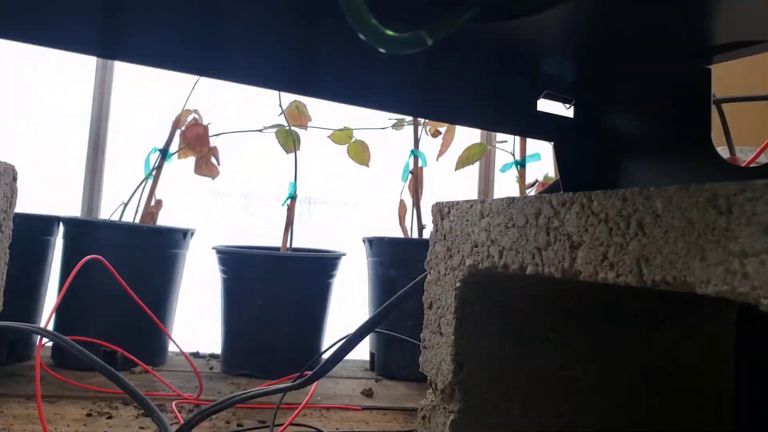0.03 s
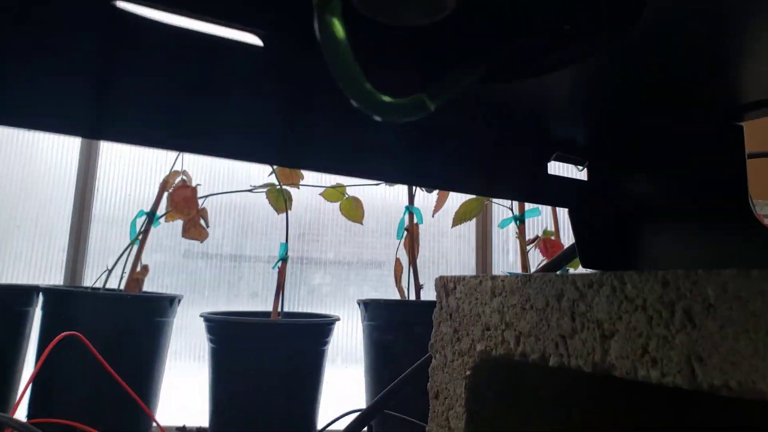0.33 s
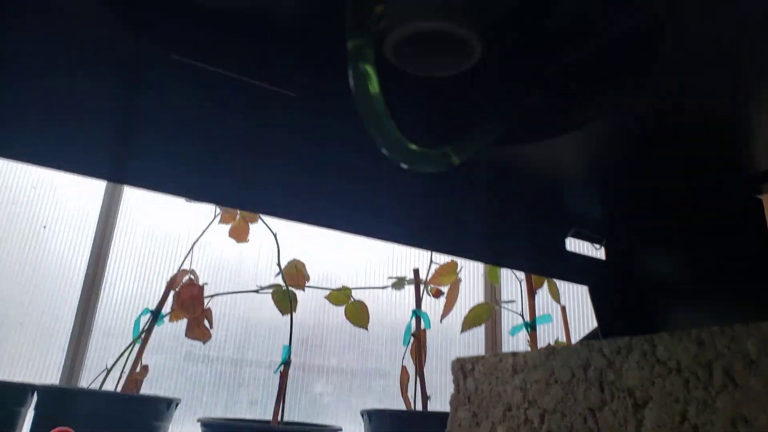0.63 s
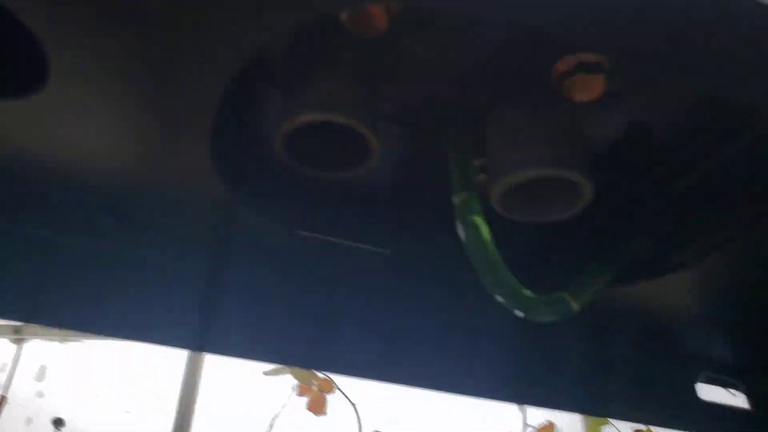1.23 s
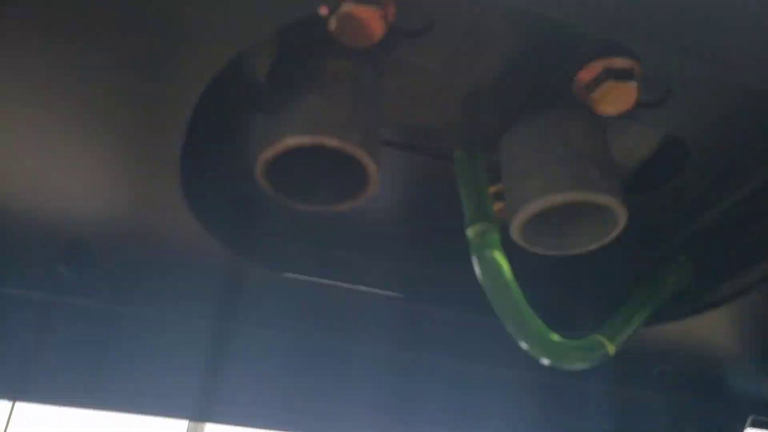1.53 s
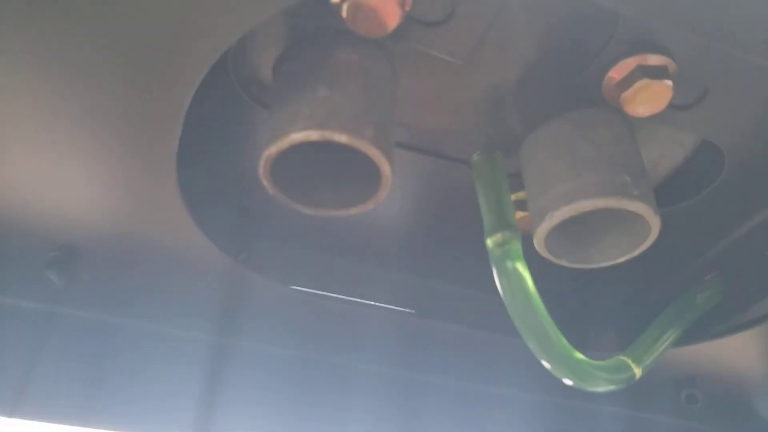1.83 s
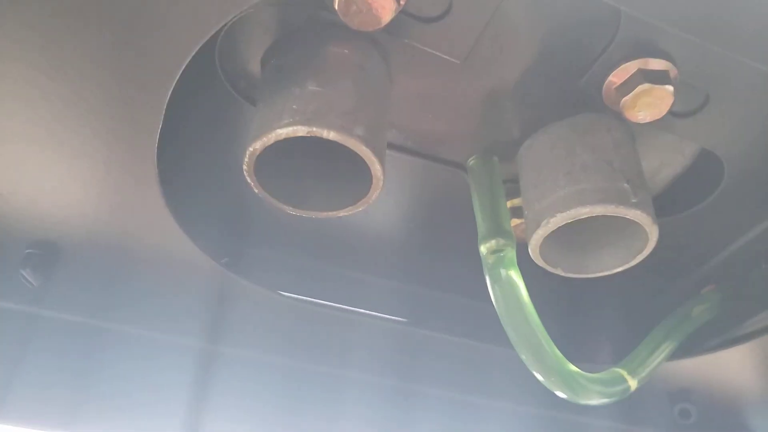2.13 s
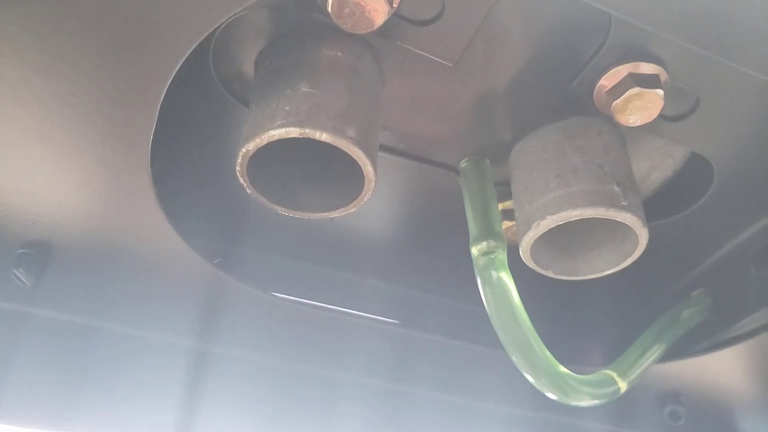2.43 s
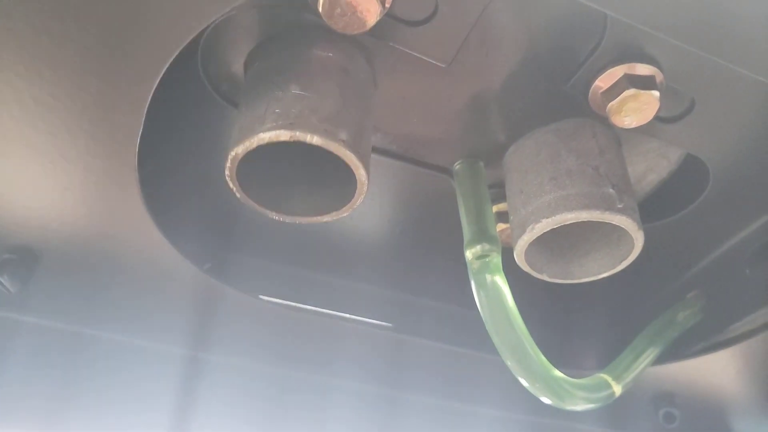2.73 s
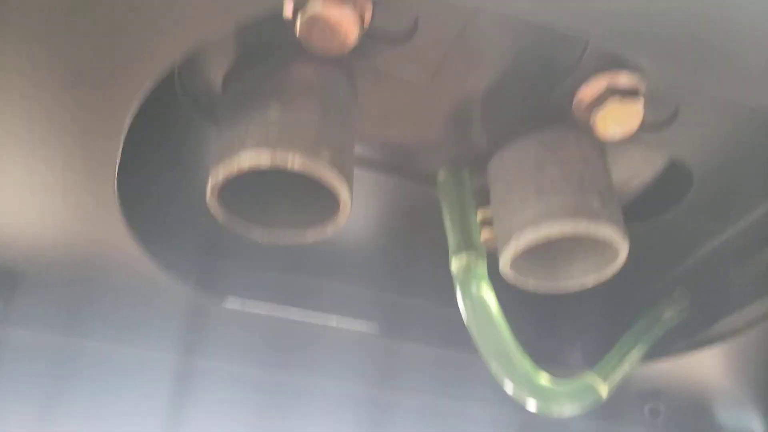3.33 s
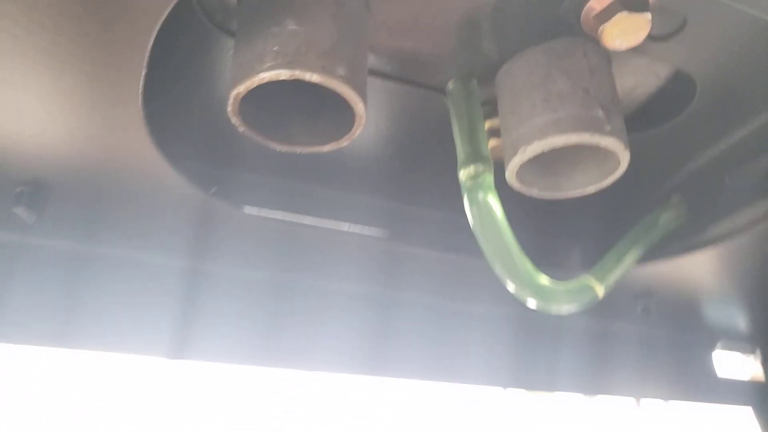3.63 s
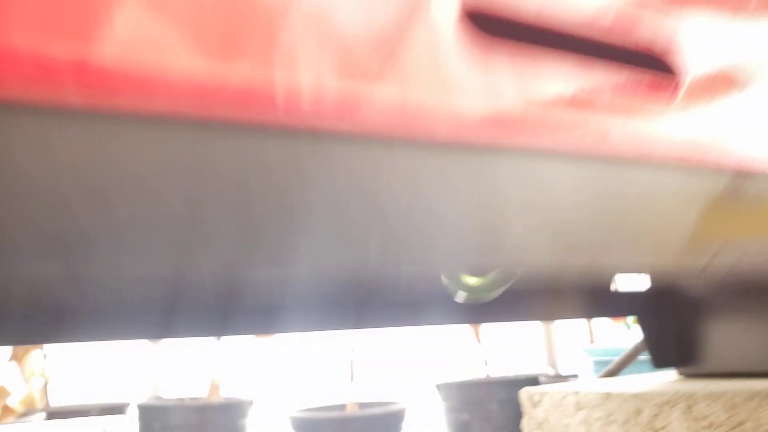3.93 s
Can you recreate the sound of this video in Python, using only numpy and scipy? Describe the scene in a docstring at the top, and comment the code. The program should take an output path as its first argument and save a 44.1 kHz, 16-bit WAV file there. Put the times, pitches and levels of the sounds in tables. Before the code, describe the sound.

A diesel air heater runs with a low roar, rushing air and blower whine.

```python
"""A diesel air heater runs indoors. From the start the burner roars low, the intake pipe sings a breathy
note, air rushes through resonant ducts and the blower whines, its hiss fluttering once a turn.
From 0.5 s the microphones move from beside the base plate in under the two open pipe stubs: the duct
resonances shift and a bright spray of air fades. The chamber's drone swells, most near 0.7 and 2.6 s.
After 3 s a thin whistle rises; from 3.5 s the microphones move partway back. Faint ticks fall between."""
import sys
import numpy as np
from scipy import signal
from scipy.fft import rfft, irfft, next_fast_len
from scipy.io import wavfile
from scipy.ndimage import uniform_filter1d, map_coordinates

SR = 44100
rng = np.random.default_rng(int(sys.argv[2]) if len(sys.argv) > 2 else 0)


def generate_wav(signal):
    """Clip the signal to [-1, 1] and save it as 16-bit WAV at the path in sys.argv[1]."""
    frames = np.transpose(np.atleast_2d(signal))
    scaled = np.clip(frames, -1, 1) * 32767
    pcm = np.round(scaled).astype(np.int16)
    wavfile.write(sys.argv[1], SR, pcm)


N = 176400
TIME_S = np.arange(N) / SR
FFT_SIZE = next_fast_len(N + 8192)
FREQ_HZ = np.fft.rfftfreq(FFT_SIZE, 1 / SR)
SIDE = np.array([[1], [-1]])  # left, right

# burner stereo balance: freq_hz, left_over_right_db
BURNER_BALANCE = [(40, 3.5), (200, 3.5), (280, 2), (400, 2)]


def burner():
    """The flame's low, flickering roar from the exhaust stub."""
    # roar spectrum: freq_hz, relative_db
    spectrum = [(15, -95.5), (30, -84), (40, -66.5), (52, -60), (73, -49.5), (92, -51), (125, -45),
                (185, -38.5), (214, -40), (248, -41.5), (274, -39), (305, -46.5), (350, -52.5), (420, -67),
                (600, -112)]
    # flame strength: time_s, level_db
    flame = [(0, -16.5), (.4, -19.5), (.55, -20), (.66, -17), (.9, -20), (1.15, -19.5), (1.42, -17.5),
             (1.62, -21), (1.8, -17.5), (2.35, -18.5), (2.6, -20.5), (2.8, -19), (3.3, -19.5), (4, -21.5)]
    trim_db, flicker_db = 0.65, 1
    roar = unit(rush(amp(over_freq(spectrum)) * pan(over_freq(BURNER_BALANCE)), likeness=1.0))
    return roar * amp(over_time(flame) + trim_db + flicker_db * wobble(rate_hz=12))


def drone():
    """The flame drives the chamber's resonance, unsteady in pitch and strength."""
    # drone swells: time_s, level_db
    swells = [(0, -31.5), (.6, -28.5), (.74, -16.5), (.82, -30), (1.3, -24.5), (1.45, -20), (1.62, -29.5),
              (1.71, -18), (1.78, -30), (2, -23), (2.2, -24), (2.44, -28.5), (2.51, -18), (2.62, -15.5),
              (2.76, -22), (2.85, -28.5), (3.1, -23), (3.5, -30.5), (4, -26)]
    pitch_hz, wander_hz, flicker_db = 213.1, 8.94, 2.5
    phase = 2 * np.pi * np.cumsum(pitch_hz + wander_hz * wobble(rate_hz=45)) / SR
    envelope = amp(over_time(swells) + flicker_db * wobble(rate_hz=35.15))
    tone = np.sqrt(2) * np.sin(phase) * envelope
    return filtered(tone, pan(over_freq(BURNER_BALANCE)) * left_lead())


def intake():
    """Turbulence rings the short intake pipe: one breathy note with a narrow core."""
    # skirt around the note: freq_hz, relative_db
    skirt = [(900, -105), (1150, -85), (1330, -59), (1400, -60), (1500, -54.5), (1570, -60.5),
             (1680, -64.5), (1900, -75.5), (2300, -105)]
    # note strength: time_s, level_db
    strength = [(0, -35.5), (.5, -37.5), (.85, -40), (1.05, -36), (1.7, -34.5), (2.3, -34), (2.9, -38),
                (4, -34.5)]
    pitch_hz, trim_db, flicker_db = 1429, 5, 0.2
    peak = amp(-50.5) * resonance(pitch_hz, width_hz=48)
    core = amp(-49) * resonance(pitch_hz, width_hz=13)
    spectrum = np.hypot(amp(over_freq(skirt)), np.hypot(peak, core))
    note = unit(rush(spectrum * pan(balance_db=-12.5), likeness=1))
    return note * amp(over_time(strength) + trim_db + flicker_db * wobble(rate_hz=10))


def airflow():
    """Air rushing through the ducts: broad noise, whistle, spray and resonances flicker together."""
    # broad rush: freq_hz, left_density_db, right_density_db
    spectrum = [(152, -77, -75), (392, -65, -60.5), (470, -60, -66), (610, -62, -65.5), (821, -63.5, -73),
                (990, -73.5, -73.5), (1170, -66.5, -69), (1770, -75, -70), (2104, -68, -75),
                (2560, -79, -94.5), (3150, -79.5, -82.5), (3700, -78.5, -89.5), (3990, -83, -97),
                (4500, -85.5, -87), (5300, -84, -85), (6130, -87.5, -109), (6700, -88, -101),
                (7140, -92, -108), (7500, -108, -120), (10000, -120, -120)]
    # rush strength: time_s, left_gain_db, right_gain_db
    strength = [(0, 0, 3), (.7, -1.5, 1.5), (1.4, -0.5, 1.5), (2.2, 0, 1.3), (3, -1, -2), (3.6, -0.5, -0.5),
                (4, -4.5, -3)]
    # likeness of the two sides: freq_hz, likeness_0_to_1
    likeness = [(350, 0.88), (600, 0.7), (760, 0), (1000, 0.5), (1250, 0.96), (2000, 0.9), (3000, 0.4),
                (5000, 0), (8000, 0)]
    flicker_db = 0.67
    broad = rush(amp(over_freq(spectrum)), over_freq(likeness))
    air = drifting(broad, drift_db=0.8) * amp(over_time(strength)) + whistle()
    bright = spray()
    air += drifting(ducts(), drift_db=1.1) + drifting(bright, drift_db=3.0)
    return air * amp(flicker_db * wobble(rate_hz=20))


def ducts():
    """Duct resonances change their mix as the microphones move in under the stubs."""
    # resonances: centre_hz, width_hz, beside_left_db, beside_right_db, under_left_db, under_right_db
    modes = [(2280, 94, -76, -73.5, -74.5, -82), (2370, 56, -65, -74, -67.5, -75),
             (2878, 48, -72.5, -69, -67.5, -68.5), (3335, 52, -68.5, -69, -73.5, -77),
             (3448, 38, -75.5, -76.5, -67, -71.5), (3860, 62, -75, -83, -75, -88),
             (4755, 54, -77.5, -81.5, -81, -87.5), (4910, 93, -87, -80.5, -85, -87),
             (5520, 180, -96.5, -81.5, -87.5, -85), (6270, 130, -93, -92.5, -91, -112),
             (6730, 75, -88, -83.5, -82.5, -94.5), (7300, 130, -100, -108, -85.5, -104)]
    # microphone place (0 beside the plate, 1 under the stubs): time_s, fraction
    path = [(0, 0), (.5, 0), (1.1, 0.55), (1.4, 0.54), (1.7, 0.86), (2.1, 0.99), (3.5, 0.96), (3.8, 0.38),
            (4, 0.49)]
    # resonance strength, highest close under the stubs: time_s, gain_db
    strength = [(0, -1.5), (.7, -1), (1.3, 0), (2.1, 2.5), (2.6, 0.5), (3.1, -2), (3.6, -1), (4, -3)]
    flicker_db = 0.83
    power = 0
    for centre_hz, width_hz, *levels_db in modes:
        power += (amp(levels_db)[:, None] * resonance(centre_hz, width_hz)) ** 2
    beside, under = (rush(gain, likeness=0.5) for gain in np.sqrt(power).reshape(2, 2, -1))
    place = np.clip(over_time(path), 0, 1)
    blend = np.sqrt(1 - place) * beside + np.sqrt(place) * under
    return blend * amp(over_time(strength) + flicker_db * wobble(rate_hz=7.3))


def spray():
    """Bright spray of air beside the base plate, fading where the plate shields it."""
    # spray spectrum: freq_hz, left_density_db, right_density_db
    spectrum = [(1000, -92, -91.5), (2100, -78.5, -72), (2600, -79, -81.5), (3830, -80, -85),
                (4420, -89, -90.5), (5500, -100, -92), (6050, -100, -96), (6800, -101, -94.5),
                (7550, -115, -118), (10000, -97.5, -92), (15000, -106, -102)]
    # shielding: time_s, gain_db
    shielding = [(0, 3), (.5, -2.5), (1.1, 0), (1.45, 0), (1.75, -7), (2.4, -16), (3.5, -21), (3.8, -2.5),
                 (4, -17)]
    return rush(amp(over_freq(spectrum)), likeness=0.34) * amp(over_time(shielding))


def blower():
    """The shaft drives whining orders and flutters the hiss once a turn; the motor drive sings above."""
    # shaft speed: time_s, turns_per_s
    shaft = [(0, 73.3), (.35, 73.15), (.7, 73.4), (1.5, 73.5), (2.4, 73.37), (3.4, 73.3), (4, 73.2)]
    # whining orders: cycles_per_turn
    orders = [21, 22, 23, 32, 38, 41]
    # whine of each order: left_db, right_db
    order_levels = [(-44.5, -37.5), (-47.5, -48.5), (-52, -55.5), (-59, -65.5), (-64, -67.5), (-70, -71)]
    # motor drive tones: pitch_hz, left_db, right_db
    drive = [(9996, -75.5, -78), (15230, -84, -88), (15377, -79, -88.5)]
    # hiss spectrum: freq_hz, left_density_db, right_density_db
    hiss_spectrum = [(6000, -115, -120), (8060, -105, -112), (8500, -103, -105), (9250, -100, -87.5),
                     (10250, -99, -97.5), (11330, -91.5, -91), (12350, -96, -89.5), (13600, -93.5, -102),
                     (15700, -97.5, -107)]
    # hiss strength: time_s, gain_db
    hiss_strength = [(0, -5.5), (.8, 0), (1.35, -1), (1.9, -0.5), (2.6, 0), (3.5, -2.5), (4, -5)]
    speed_wander, flutter_depth = 0.0007, 0.12
    whine_flicker_db, hiss_flicker_db = 1.8, 0.55
    turns_per_s = over_time(shaft)[0] * (1 + speed_wander * wobble(rate_hz=15))
    shaft_rad = 2 * np.pi * np.cumsum(turns_per_s) / SR
    tones = [(order * shaft_rad, levels_db) for order, levels_db in zip(orders, order_levels)]
    tones += [(2 * np.pi * pitch_hz * TIME_S, levels_db) for pitch_hz, *levels_db in drive]
    whine = 0
    for phase, levels_db in tones:
        tone = np.sqrt(2) * np.sin(phase + SIDE)  # sides 2 rad apart
        whine += amp(levels_db)[:, None] * tone * amp(whine_flicker_db * wobble(rate_hz=6.92))
    hiss = drifting(rush(amp(over_freq(hiss_spectrum)), likeness=0.1), drift_db=2.5)
    hiss *= amp(over_time(hiss_strength) + hiss_flicker_db * wobble(rate_hz=18))
    return whine + hiss * (1 + flutter_depth * np.sin(shaft_rad))


def whistle():
    """Thin airy whistle, heard off to the side of the stubs."""
    # whistle strength: time_s, level_db
    strength = [(0, -62), (.3, -69), (1.3, -75), (2.8, -72), (3.2, -56), (3.6, -61), (3.8, -56.5), (4, -52)]
    band = unit(rush(resonance(centre_hz=4890, width_hz=130), likeness=0.41))
    return band * pan(balance_db=1.5) * amp(over_time(strength))


def ticks():
    """Tiny dry treble clicks: a sharp first contact, then a short rattle."""
    # contacts: start_s, level_db
    contacts = [(.049, -46.5), (.199, -42.5), (.483, -37), (.637, -42), (1.029, -32), (1.041, -46),
                (2.261, -32), (3.604, -41.5)]
    # tick colour: freq_hz, gain_db
    colour = [(2000, -20), (6000, 0), (8000, -13), (10000, -3), (13500, 1), (15500, -4.5)]
    t60_s, rattle_gain_db, snap_gain_db = 0.006, -8, 9
    age_s = np.arange(SR // 20) / SR
    clicks = np.zeros((2, N + SR))
    for start_s, level_db in contacts:
        start = round(start_s * SR)
        decay = amp(level_db + rattle_gain_db - 60 * age_s / t60_s)
        clicks[:, start:start + len(age_s)] += decay * rng.standard_normal((2, len(age_s)))
        clicks[:, start] = amp(level_db + snap_gain_db)
    return filtered(clicks[:, :N], amp(over_freq(colour))) * pan(balance_db=-3)


def rush(gain, likeness):
    """Stereo noise, gain per root Hz; likeness 0 gives independent sides."""
    common, opposed = rfft(rng.standard_normal((2, FFT_SIZE)))
    spread_rad = np.arccos(np.clip(likeness, 0, 1)) / 2
    pair = np.cos(spread_rad) * common + SIDE * np.sin(spread_rad) * opposed
    return irfft(pair * left_lead() * gain * np.sqrt(SR / 2), FFT_SIZE)[:, :N]


def left_lead():
    """Phase factors that put the left side ahead."""
    # left over right phase: freq_hz, lead_rad
    lead = [(50, .15), (280, 0.31), (450, 1.28), (620, 0.64), (900, 6.45), (1400, 8), (1540, 8.5),
            (1700, 9.2), (2000, 13.35), (2850, 14.2), (3400, 17.8), (4600, 19.56), (6000, 23.33)]
    return np.exp(0.5j * SIDE * over_freq(lead))


def drifting(x, drift_db):
    """Shifting reflections slowly lift and dip narrow bands, differently on each side."""
    bands = signal.stft(x, nperseg=512)[2]
    drift = rng.standard_normal(bands.shape)
    for _ in range(2):
        drift = uniform_filter1d(drift, size=4, axis=1)  # across frequency
        drift = uniform_filter1d(drift, size=110, axis=2, mode="wrap")  # across time
    return signal.istft(bands * amp(drift_db * unit(drift)), nperseg=512)[1][:, :N]


def resonance(centre_hz, width_hz):
    """Gain of one air resonance, 1 at its centre."""
    return 1 / (1 + ((FREQ_HZ - centre_hz) / width_hz) ** 2)


def amp(db):
    """Decibels to gain."""
    return 10 ** (np.asarray(db) / 20)


def unit(x):
    """Scaled to rms 1."""
    return x / np.sqrt(np.mean(x ** 2))


def over_freq(rows):
    """Value columns on FREQ_HZ, interpolated in log frequency."""
    freq_hz, *columns = np.transpose(rows)
    return np.array([np.interp(np.log(FREQ_HZ + 1), np.log(freq_hz + 1), c) for c in columns])


def over_time(rows):
    """Value columns, one value per sample."""
    time_s, *columns = np.transpose(rows)
    return np.array([np.interp(TIME_S, time_s, c) for c in columns])


def wobble(rate_hz):
    """Smooth random curve, rate_hz knots a second."""
    return map_coordinates(rng.standard_normal(int(N * rate_hz / SR) + 4), [TIME_S * rate_hz])


def pan(balance_db):
    """Stereo gains; positive is left."""
    return amp(0.5 * SIDE * balance_db)


def filtered(x, gain):
    """x through a gain given on FREQ_HZ."""
    return irfft(rfft(x, FFT_SIZE) * gain, FFT_SIZE)[..., :N]


def scene():
    """The whole heater, close by."""
    return burner() + drone() + intake() + airflow() + blower() + ticks()


def record(dry):
    """Brick-wall low-pass."""
    return filtered(dry, FREQ_HZ < 15750)


dry = scene()
out = record(dry)
generate_wav(out)
```